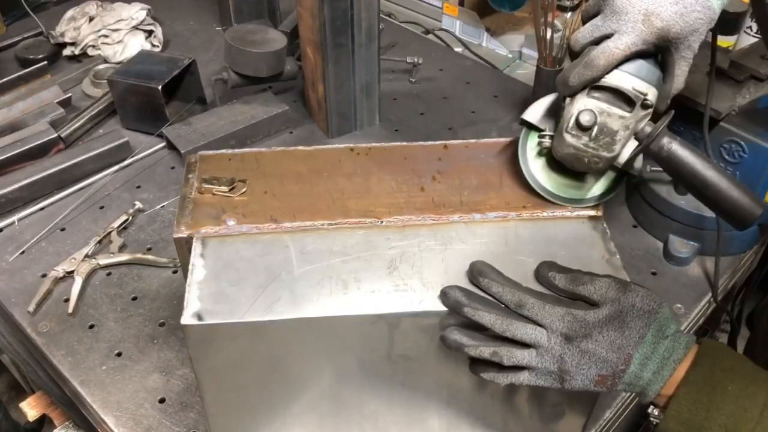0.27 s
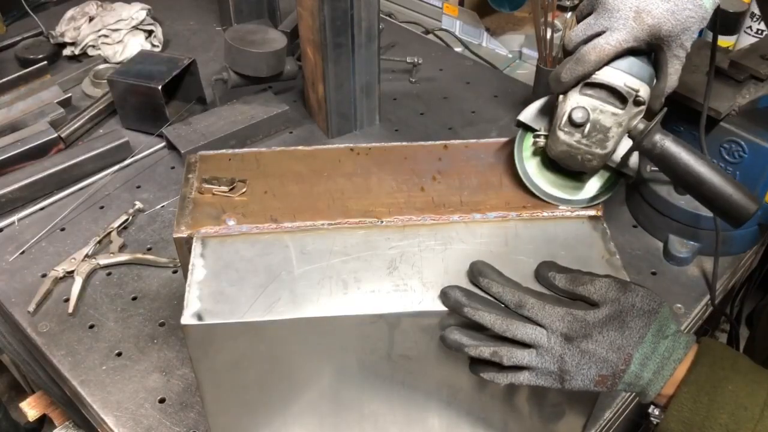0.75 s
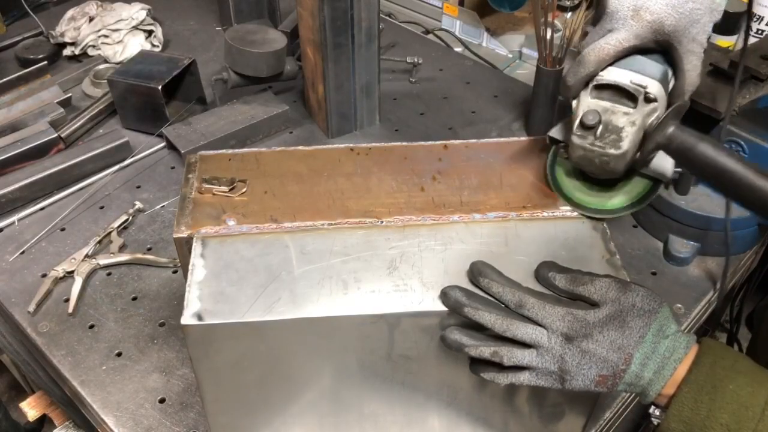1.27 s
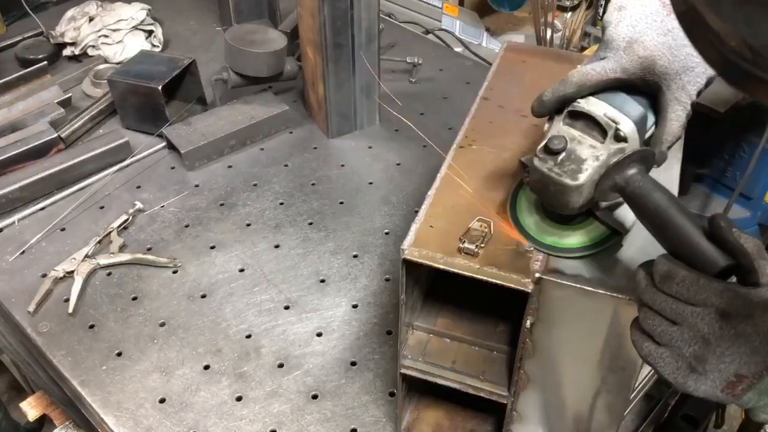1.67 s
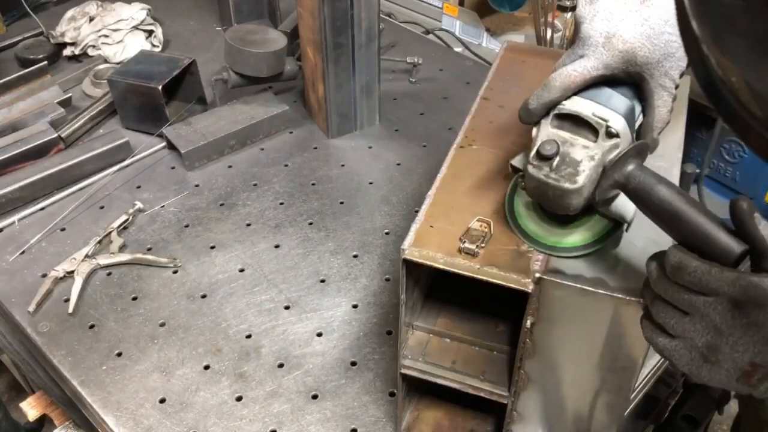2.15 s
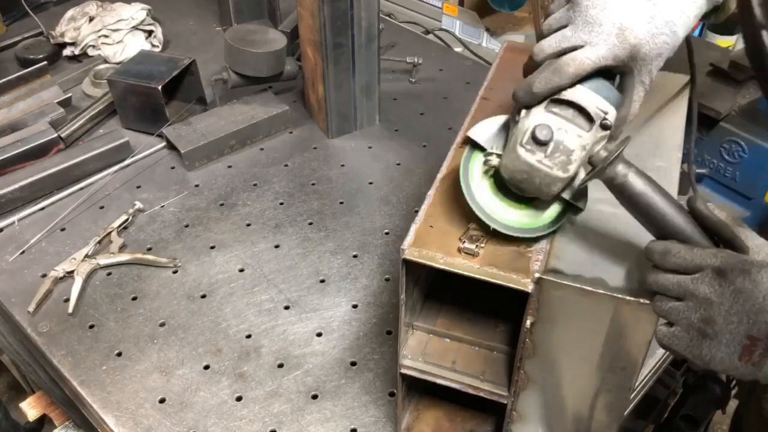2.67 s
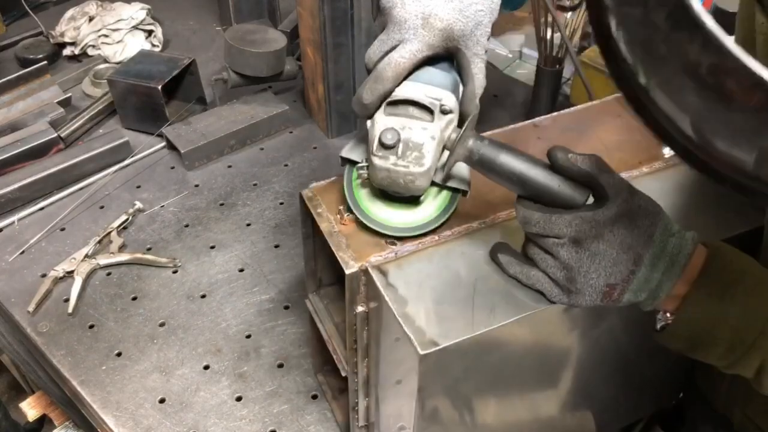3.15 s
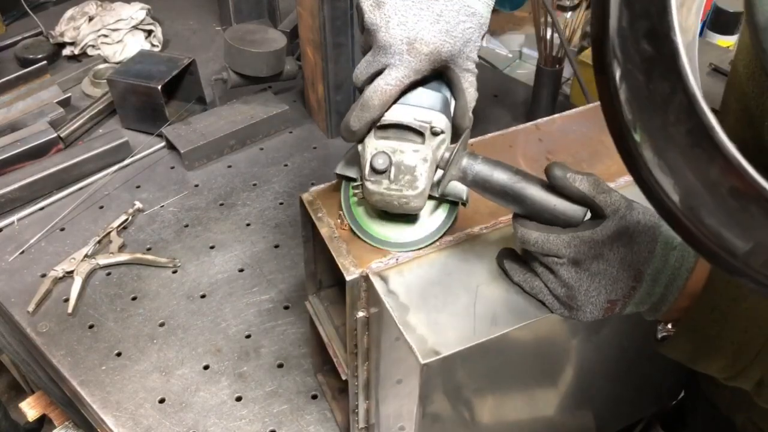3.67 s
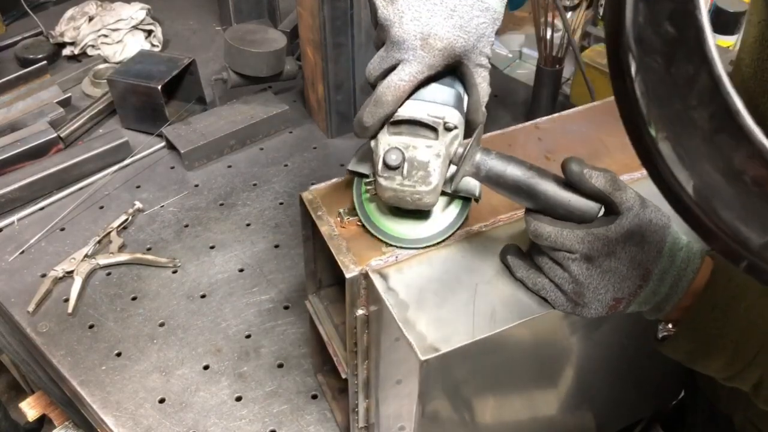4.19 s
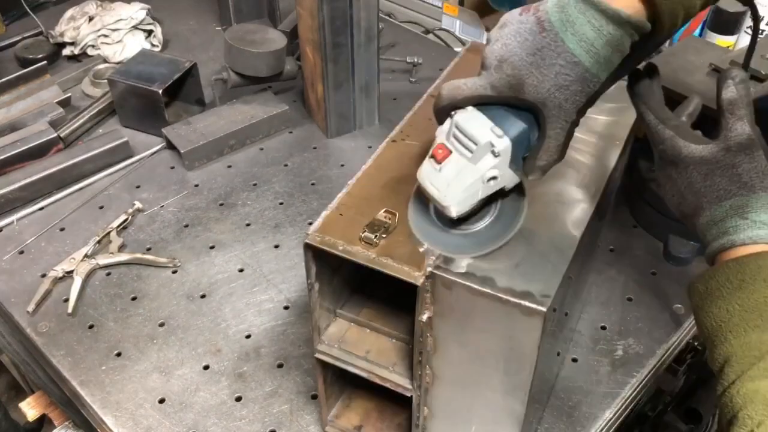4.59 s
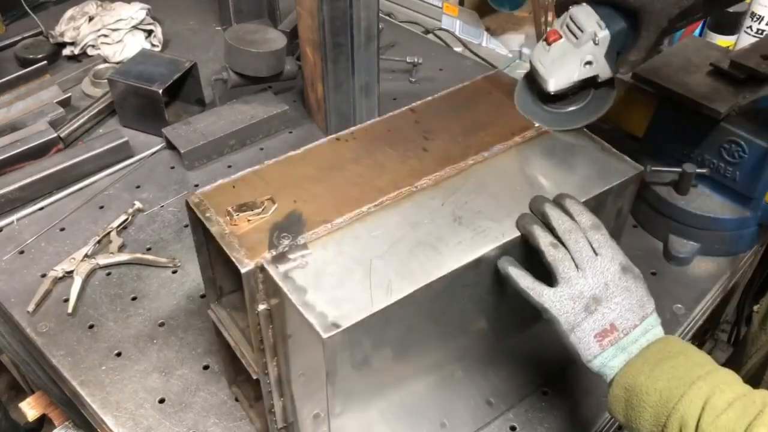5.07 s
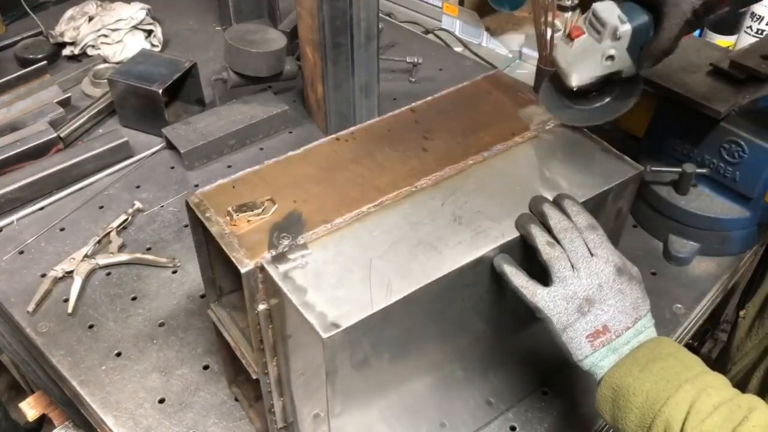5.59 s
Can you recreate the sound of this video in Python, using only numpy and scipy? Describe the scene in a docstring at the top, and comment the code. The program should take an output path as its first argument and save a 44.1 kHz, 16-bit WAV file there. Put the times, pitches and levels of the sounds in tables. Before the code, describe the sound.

Two angle grinders, one after the other, screech against a steel box in quick bursts over hiss and a thin motor whine.

```python
"""Fan hiss and a thin motor whine, then the screech of a disc on steel: two angle grinders, one after the
other, dab at the weld seams of a steel box in a workshop, heard sped up. The uneven disc excites the
steel periodically, so each touch sounds a harmonic series (the orders of the disc) that sags under load.
The box is dragged and rings in its modes, and two sharp ticks part the three stretches of work. Mono."""
import sys
import numpy as np
from scipy import signal
from scipy.fft import rfft, irfft
from scipy.io import wavfile
from scipy.ndimage import uniform_filter1d

SR = 44100
rng = np.random.default_rng(int(sys.argv[2]) if len(sys.argv) > 2 else 0)


def generate_wav(sig):
    """Save sig (samples, or channels by samples) to the path in sys.argv[1] as 16-bit PCM at SR."""
    pcm = np.round(np.clip(np.atleast_2d(sig).T, -1, 1) * 32767).astype(np.int16)
    wavfile.write(sys.argv[1], SR, pcm)


N = 257103
SWAP_S = 4.336  # the second grinder takes over; paired settings are (first, second grinder)
EDGE_HZ = 15750


def gain_of(db):
    return 10 ** (np.asarray(db) / 20)

def unit_rms(x):
    return x / np.sqrt(np.mean(x ** 2) + 1e-20)

def response(points, hz):
    """Gain of a spectral envelope, interpolated in dB over log frequency."""
    f, db = np.transpose(points)
    return gain_of(np.interp(np.log(hz + 1), np.log(f + 1), db))

def coloured(x, points):
    """Filtering multiplies the spectrum by an envelope."""
    return irfft(rfft(x) * response(points, np.fft.rfftfreq(len(x), 1 / SR)), len(x))

def curves(rows, t):
    s, *columns = np.transpose(sorted(rows))
    return [np.interp(t, s, c) for c in columns]

def add(mix, s, sound):
    part = mix[round(s * SR):][:len(sound)]
    part += sound[:len(part)]

def drift(per_s, size):
    """Slow random fluctuation of unit rms."""
    points = rng.standard_normal(int(size / SR * per_s) + 3)
    line = np.interp(np.arange(size) * per_s / SR, np.arange(len(points)), points)
    return unit_rms(uniform_filter1d(line, 200))

def resonate(x, hz, width):
    """A resonance of unit gain is a low-pass filter shifted up to hz."""
    carrier = np.exp(2j * np.pi * hz * np.arange(len(x)) / SR)
    pole = np.exp(-np.pi * width / SR)
    return 2 * (carrier * signal.lfilter([1 - pole], [1, -pole], x / carrier)).real


# Contacts of disc and steel. Each row: start and end in seconds, level in dB at start, middle and end,
# extra dB above TOP_HZ, relative level of the landing scratch in dB.
TOUCHES = [(0.206, 0.474, -42, -35.5, -36.5, -1.5, 5.5), (0.574, 0.829, -35, -37.5, -37.5, -1, -12),
           (0.949, 1.289, -36, -38, -36.5, -1, -4), (1.326, 1.423, -29.5, -34.5, -36, -0.5, -13),
           (1.503, 1.873, -36.5, -33, -37, 2.5, -5.5), (2.051, 2.19, -39, -38.5, -39.5, -0.5, -5),
           (2.247, 2.493, -40.5, -37.5, -38.5, 0.5, -13), (3.375, 3.61, -38.5, -35.5, -35, -2, -5),
           (3.665, 3.715, -34, -39, -32, 0, -12), (3.73, 3.822, -34, -40, -33.5, 0, -4),
           (3.841, 3.882, -32, -44, -30, 2, -7), (3.891, 4.144, -35.5, -39, -34, 1, -8),
           (4.224, 4.335, -39.5, -35.5, -33.5, -3.5, 3), (4.473, 4.608, -39.5, -49, -45, -7, -14),
           (4.921, 5.503, -44, -48, -48.5, 1, 1), (5.568, 5.77, -40.5, -46.5, -43.5, 5, -10)]
# Spectra of grips 0 to 3. Each entry: relative level of one order in dB, from the fundamental up.
FLAT_DB = [-77, -76, -74, -65.5, -69.5, -67, -66, -42.5, -51.5, -51, -45.5, -49, -50, -62, -52.5, -59.5,
           -61, -58.5, -49.5, -48.5, -60, -47.5, -54, -56, -51, -50, -50, -80]
BOGGED_DB = [-82, -75, -81, -64, -60, -74, -76, -54, -55, -49.5, -54, -57, -59, -52, -42.5, -54, -62, -50,
             -57, -78, -64, -41.5, -47, -50, -46, -54, -58, -34.5]
TILTED_DB = [-74.5, -74, -75, -55, -73.5, -78, -71, -47.5, -61, -56, -50, -36, -39, -55, -52, -62, -54.5,
             -67, -63, -48, -47, -61, -44, -59, -48, -49, -52, -48]
SECOND_GRINDER_DB = [-77, -67, -55.5, -65.5, -66, -64, -64, -63, -60.5, -62.5, -65.5, -58.5, -61, -61, -67,
                     -62, -58, -58.5, -60, -61, -65, -57, -57, -54.5, -53.5, -57, -59, -70]
# Orders that sing out or drop back. Each row: start and end in seconds, order, extra dB.
SINGING_ORDERS = [(.2, 1.3, 11, 3), (.6, .84, 13, 4), (1.12, 1.3, 12, 6), (1.5, 1.62, 8, 7),
                  (1.5, 1.56, 12, -7), (1.5, 1.56, 13, -6), (2.04, 2.5, 4, 6), (2.04, 2.5, 12, -4),
                  (2.33, 2.5, 13, 9), (2.42, 2.5, 10, 5), (2.42, 2.5, 8, -5), (3.37, 3.62, 10, 4),
                  (3.55, 3.96, 20, 5), (3.95, 4.15, 13, 12), (4.04, 4.15, 12, 6), (3.9, 4.34, 2, 7),
                  (4.22, 4.34, 11, -4), (4.47, 4.62, 3, -9), (4.47, 4.62, 7, 11), (4.47, 4.62, 8, 9),
                  (4.47, 4.62, 9, 7), (4.47, 4.62, 11, 14), (4.47, 4.62, 19, 9), (5.28, 5.5, 12, 6),
                  (5.28, 5.5, 18, 7), (5.28, 5.5, 25, 4), (5.28, 5.5, 28, 17), (5.67, 5.78, 3, -5)]
# Spectrum of grit on steel. Each row: frequency in Hz, relative level in dB.
GRIT_SPECTRUM = [(1000, -26.5), (3500, -18), (4600, 10), (6800, -8), (9000, -15), (11500, 10), (15500, -23)]
SHUDDER_TURNS, WANDER_DB = (.0026, .0052), (1.4, 2.8)
TOP_HZ, BLOOM_DB, BLOOM_S = 9050, (-1.5, -9), (.03, .15)  # top orders swell as the disc digs in

def grind(start, end, first_db, middle_db, last_db, top_db, scratch_db, grip):
    """Periodic excitation: the disc's bumps make harmonics that flutter as the contact patch shifts."""
    t, grinder = np.arange(start, end, 1 / SR), int(start > SWAP_S)
    age, size, hz = t - start, len(t), disc_speed(t)
    turns = np.cumsum(hz) / SR + SHUDDER_TURNS[grinder] * drift(205, size)
    top_db = top_db + BLOOM_DB[grinder] * np.exp(-age / BLOOM_S[grinder])
    levels = gain_of([FLAT_DB, BOGGED_DB, TILTED_DB, SECOND_GRINDER_DB][grip])
    tones = np.zeros(size)
    for k, level in enumerate(levels / np.linalg.norm(levels), 1):
        wander_db = (WANDER_DB[grinder] + .057 * k) * drift(20.5, size) + 1.76 * drift(81, size)
        sing_db = sum(db * np.clip(np.minimum(t - a, b - t) / .03 + .5, 0, 1)
                      for a, b, order, db in SINGING_ORDERS if order == k)
        level = level * gain_of(wander_db + sing_db + top_db * (k * hz > TOP_HZ))
        cycles = k * turns + rng.random() + .035 * drift(90, size)
        tones += level * np.sqrt(2) * np.cos(2 * np.pi * cycles)
    puffs = rng.standard_normal(size) * (.3 + np.exp(-(turns % 1) / .2))  # one a turn
    grit = unit_rms(coloured(puffs, GRIT_SPECTRUM))
    landing = np.exp(-age / .012)
    sound = tones * (1 - .53 * landing) + grit * (gain_of(-14) + gain_of(scratch_db) * landing)
    bite_db = np.interp(t, [start, (start + end) / 2, end], [first_db, middle_db, last_db])
    edges = np.minimum(np.minimum(age / .0015, (t[-1] - t) / .012), 1)
    return gain_of(bite_db + .9 * drift(45, size)) * sound * edges


# The disc in each touch. Each row: speed at bite and at lift in turns per second, grip number.
TOUCH_SPEEDS = [(593.5, 579, 0), (586, 570, 0), (583, 565, 0), (501, 497.5, 1), (560, 549, 2),
                (580, 573, 0), (581, 564, 0), (588, 573, 0), (580, 577, 0), (577.5, 578, 0),
                (578, 578.4, 0), (577, 559, 0), (577, 571.5, 0), (642, 607, 3), (640, 554.5, 3),
                (622, 552, 3)]
# Openings of the stretches of work, then the close. Each row: time in seconds, turns per second.
STRETCHES = [(0, 587), (1.328, 503), (4.336, 612), (5.83, 590)]
LAG_S, SAG_S, RECOVER_S = .025, (.45, .085), .1  # delay before slowing, then two time constants
LONG_GAP_S, FREE_HZ = .25, (592, 655)  # in a long gap the disc reaches its free speed

def disc_speed(t):
    """Exponential relaxation: the rotation rate, in Hz, sags under load and recovers between touches."""
    marks = [(s - 1e-4, np.nan, 0) for s, _ in STRETCHES[1:3]]
    marks += [(s, hz, RECOVER_S) for s, hz in STRETCHES]
    next_starts = [row[0] for row in TOUCHES[1:]] + [0]
    for (start, end, *_), next_start, (bite_hz, lift_hz, _) in zip(TOUCHES, next_starts, TOUCH_SPEEDS):
        grinder = int(start > SWAP_S)
        marks += [(start + LAG_S, bite_hz, SAG_S[grinder]), (end, lift_hz, RECOVER_S)]
        if next_start - end > LONG_GAP_S:
            marks.append((next_start, FREE_HZ[grinder], 1))
    s, hz, tau = np.transpose(sorted(marks, key=lambda m: m[0]))
    hz = np.where(np.isnan(hz), np.roll(hz, 1), hz)  # a stretch ends at the speed it had
    k = np.clip(np.searchsorted(s, t, "right") - 1, 0, len(s) - 2)
    tau = np.maximum(tau[k], 1e-3)
    progress = np.expm1(-(t - s[k]) / tau) / np.expm1(-(s[k + 1] - s[k] + 1e-9) / tau)
    return hz[k] + (hz[k + 1] - hz[k]) * np.clip(progress, 0, 1)

def load(t, ramp_s=.06):
    """Mechanical load: 0 while the disc runs free, 1 while it is on steel."""
    contact = sum((t > start) & (t < end) for start, end, *_ in TOUCHES).astype(float)
    return uniform_filter1d(contact, round(ramp_s / (t[1] - t[0])))


# High modes of the steel plates. Each row: frequency in Hz, bandwidth in Hz, gain in dB.
PLATE_MODES = [(2780, 14, 6), (5010, 10, 7), (5690, 8, 8), (6800, 12, 3), (11030, 14, 4), (11530, 12, 5)]

def plates_and_walls(screech):
    """Resonance and reflection: the screech drives the plates, and the walls add a short tail."""
    t = np.arange(6000) / SR
    echoes = rng.choice([-1., 1.], len(t)) * (rng.random(len(t)) < .1) * gain_of(-60 * t / 1.26)
    tail = signal.oaconvolve(screech, echoes / np.linalg.norm(echoes))[:len(screech)]
    plates = sum(gain_of(db) * resonate(screech, hz, width) for hz, width, db in PLATE_MODES)
    return screech + plates + gain_of(-13) * tail


# Modes of the box. Each row: frequency in Hz, relative level in dB, base 60 dB decay time in seconds.
BOX_MODES = [(953, 0, .42), (760, -4, .25), (479, -14, .6), (2169, -6, .18), (620, -12, .1),
             (1916, -19, .3), (2885, -18, .2), (3370, -20, .3)]
# Blows on the box. Each row: time in seconds, level in dB, extra dB of the second mode, extra dB of
# the high modes, factor on the decay time.
KNOCKS = [(2.81, -42, 2.5, -10, 0.28), (2.865, -42.5, 8, -12, 0.24), (2.901, -50.5, 13.5, -4, 0.45),
          (2.94, -47.5, 7, -10, 0.34), (2.966, -47, 10, -10, 0.59), (2.989, -40, -5, 5, 1.36),
          (4.235, -65.5, 13, -10, 0.63), (4.75, -50, 9, -8, 0.12)]
# Scrapes on the bench. Each row: start and release in seconds, level in dB, extra dB of the high modes.
DRAGS = [(2.801, 3.0, -49.5, -4.5), (2.899, 2.926, -53.5, 8.5), (4.337, 4.477, -59, -13),
         (4.711, 4.813, -58, 0)]

def box(high_hz=1500, rise_s=.012, fade_db_per_s=150):
    """Modal vibration: the steel box rings freely after blows and is driven by friction when dragged."""
    t, out = np.arange(SR // 2) / SR, np.zeros(N)
    hz, db, t60 = np.array(BOX_MODES).T[:, :, None]
    attack = np.sin(np.pi / 2 * np.minimum(t / .0026, 1)) ** 2
    for s, blow_db, second_db, high_db, ring in KNOCKS:
        mode_db = db + high_db * (hz > high_hz)
        mode_db[1] += second_db
        modes = gain_of(mode_db - 60 * t / (t60 * ring)) * np.sin(2 * np.pi * hz * t)
        add(out, s, gain_of(blow_db) * modes.sum(0) * attack)
    friction = rng.standard_normal(len(t)) * gain_of(3.1 * drift(116.6, len(t)))
    driven = np.array([gain_of(level / 2) * resonate(resonate(friction, f, .12 * f), f, .12 * f)
                       for f, level, _ in BOX_MODES])
    driven /= driven.sum(0).std()
    for start, release, drag_db, high_db in DRAGS:
        fade_db = fade_db_per_s * np.maximum(t - release + start, 0)
        envelope = np.minimum(t / rise_s, 1) * gain_of(drag_db - fade_db)
        scrape = (gain_of(high_db * (hz > high_hz)) * driven).sum(0)
        add(out, start, envelope * np.roll(scrape, rng.integers(len(t))))
    return out


# Sharp ticks. Each row: time in seconds, level in dB, length in milliseconds, thump level in dB.
TICKS = [(1.327, -20, 1.815, -46), (4.335, -21.5, 1.09, -48.5)]
# Their spectrum. Each row: frequency in Hz, relative level in dB.
TICK_SPECTRUM = [(100, -41), (1000, -5.5), (3000, -4), (8000, 3), (11000, -3), (16000, -9.5)]

def ticks():
    """A brief pulse has a broad spectrum: a bright burst of noise on top of a soft thump."""
    t, out = np.arange(2048) / SR, np.zeros(N)
    lead = 64  # samples of room for the filter to ring ahead
    for s, db, ms, thump_db in TICKS:
        burst = rng.choice([-1., 1.], len(t)) * (t < ms / 1000) * (1 + 1.7 * np.exp(-t / .0001))
        bright = coloured(np.roll(burst, lead), TICK_SPECTRUM)
        add(out, s - lead / SR, gain_of(db) * bright * np.linalg.norm(burst) / np.linalg.norm(bright))
        add(out, s, gain_of(thump_db) * (t / .00023) * np.exp(1 - t / .00041))
    return out


# Whine of the armature. Each row: time in seconds, level of the fundamental in dB.
WHINE_LEVELS = [(0, -66.5), (.7, -69), (1.32, -64), (1.4, -59.5), (1.9, -62), (2.1, -67), (2.65, -65),
                (3, -61), (3.36, -57.5), (3.42, -62.5), (4.3, -63.5), (4.4, -58), (4.9, -59.5), (5.1, -69),
                (5.5, -64.5), (5.83, -63)]
# Its overtones. Each row: harmonic number, relative level in dB.
OVERTONES = [(2, 0), (4, -2), (6, -3)]
GEAR_RATIOS = 3.556, 3.913  # armature turns per disc turn
OVERTONE_FREE_DB, OVERTONE_DB_PER_HZ = (6.5, -8), .5  # overtones fade as the disc slows

def armature():
    """Rotational tones: the motor whines at a geared multiple of the disc rate; the shaft hums faintly."""
    t = np.arange(N) / SR
    hz, first = disc_speed(t), t < SWAP_S
    disc_turns = np.cumsum(hz) / SR + .019 * drift(24, N)
    motor_turns = np.cumsum(hz * np.where(first, *GEAR_RATIOS)) / SR + .064 * drift(40, N)
    sag_hz = np.where(first, *FREE_HZ) - hz
    overtone_db = np.where(first, *OVERTONE_FREE_DB) - OVERTONE_DB_PER_HZ * sag_hz
    overtones = sum(gain_of(db + overtone_db + 2 * drift(30, N)) * np.cos(2 * np.pi * k * motor_turns)
                    for k, db in OVERTONES)
    whine = np.sqrt(2) * (np.cos(2 * np.pi * motor_turns) + overtones)
    shaft_db = np.where(first, -77, -68) - 3.2 * load(t) + .83 * drift(49, N)
    whine_db = curves(WHINE_LEVELS, t)[0] + 1.8 * drift(25, N)
    return gain_of(whine_db) * whine + gain_of(shaft_db) * np.cos(2 * np.pi * disc_turns)


# Air through the grinder. Each row: time in seconds, casing roar in dB, fan hiss near 9.5 kHz in dB,
# extra dB of howl in the vents.
AIR_LEVELS = [(0, -56, -52.5, -2.5), (.2, -51, -48, -1.5), (.9, -53, -49, -2.5), (1.32, -53.5, -51.5, -5),
              (1.335, -54, -52, -2), (1.95, -54.5, -52.5, 0), (2.22, -52.5, -49.5, -2.5),
              (2.54, -55, -53, -1.5), (2.69, -53.5, -48.5, 0), (2.88, -48, -46.5, 0.8),
              (3.37, -51.5, -48, -1), (3.63, -50.5, -47, -2.5), (4.33, -52, -50.5, 1),
              (4.342, -51, -47, -0.5), (4.5, -52, -48.5, 0), (4.82, -54, -47, -0.5), (4.95, -53, -51.5, 0),
              (5.83, -54, -51.5, 0)]
# Air spectrum of each grinder. Each row: frequency in Hz, relative level in dB.
FIRST_FAN = [(60, -127), (150, -114), (250, -101), (500, -100), (1000, -92), (2000, -89), (3100, -89),
             (4200, -83.5), (5500, -81.5), (7800, -70.5), (9300, -77.5), (11500, -77), (14300, -72.5),
             (15600, -70.5)]
SECOND_FAN = [(60, -128), (150, -115), (250, -102), (500, -99), (1000, -94), (2000, -87), (3500, -83.5),
              (5500, -78.5), (7000, -74.5), (9000, -72.5), (11000, -69.5), (13000, -68.5), (15600, -67.5)]
# Resonances of the vents. Each row: frequency in Hz, width in Hz, share of the howl.
VENTS = [(7020, 770, 0.79), (8070, 920, 1), (14000, 1200, 0.91)]
SPLIT_HZ = 4240  # casing below, fan above
CASING_DIP_DB, HISS_DIP_DB = -3.5, -.5  # under load

def air():
    """Broadband flow noise: casing roar and fan hiss, their spectrum fluctuating in random patches."""
    frames, hz = N // 128 + 5, np.fft.rfftfreq(512, 1 / SR)[:, None]
    t = np.arange(frames) * 128 / SR
    real, imag, patches = rng.standard_normal((frames, 257, 3)).T
    noise = real + 1j * imag
    patches = unit_rms(uniform_filter1d(uniform_filter1d(patches, 6, 0), 14, 1))
    casing_db, hiss_db, howl_db = curves(AIR_LEVELS, t)
    loaded = load(t)
    colour = np.where(t < SWAP_S, response(FIRST_FAN, hz), response(SECOND_FAN, hz))
    fan_share = 1 / (1 + (SPLIT_HZ / (hz + 1)) ** 14)
    casing = colour * np.sqrt(1 - fan_share)
    casing *= gain_of(casing_db + CASING_DIP_DB * loaded) / np.linalg.norm(casing, axis=0)
    hiss = colour * np.sqrt(fan_share) * (hz < EDGE_HZ)
    hiss /= np.linalg.norm(hiss * (abs(hz - 9500) < 700), axis=0)
    tilt_db = (-2.3 - .2 * loaded) * np.log2((hz + 1) / 9000)
    vent_db = howl_db * sum(share * np.exp(-((hz - f) / width) ** 2) for f, width, share in VENTS)
    hiss *= gain_of(hiss_db + HISS_DIP_DB * loaded + tilt_db + vent_db)
    spectra = noise * np.hypot(casing, hiss) * gain_of(2 * patches)
    unit = signal.istft(noise / np.sqrt(257), nperseg=512, noverlap=384)[1].std()
    return signal.istft(spectra, nperseg=512, noverlap=384)[1][:N] / unit


# Hums of the workshop. Each row: frequency in Hz, bandwidth of each filter stage in Hz, level in dB.
HUMS = [(330.8, 23.6, -75), (419.7, 13, -78.5), (179.7, 12, -90), (1741, 24, -76)]

def hums():
    """Narrowband noise is heard as a wavering tone."""
    return sum(gain_of(db) * unit_rms(resonate(resonate(rng.standard_normal(N), hz, width), hz, width))
               for hz, width, db in HUMS)


def scene():
    """Superposition: the screech, the box and the ticks add to the steady machine noise."""
    screech = np.zeros(N)
    for touch, (_, _, grip) in zip(TOUCHES, TOUCH_SPEEDS):
        add(screech, touch[0], grind(*touch, grip))
    mix = armature() + air() + hums() + box() + ticks()
    per_grinder = np.split(screech, [round(SWAP_S * SR)])  # the first one's tail stops at the swap
    mix += np.concatenate([plates_and_walls(part) for part in per_grinder])
    return np.array([mix, mix])

def record(dry):
    """Band limiting: a low-pass filter removes the treble above EDGE_HZ."""
    lowpass = signal.firwin(511, EDGE_HZ, window=("kaiser", 9), fs=SR)
    return signal.oaconvolve(dry, lowpass[None], "same")


dry = scene()
out = record(dry)
generate_wav(out)
```